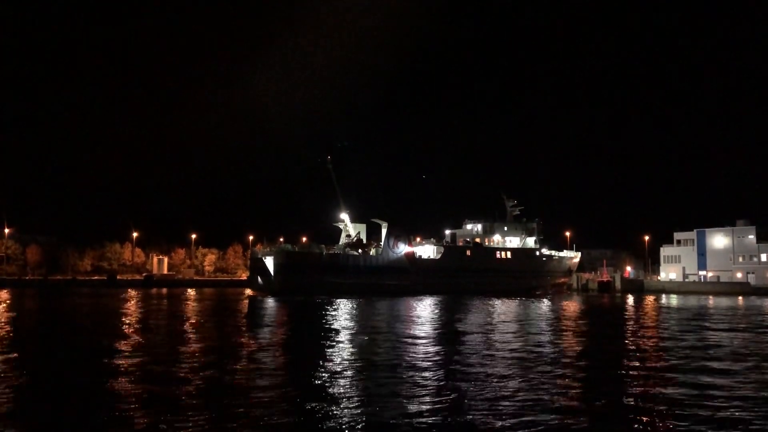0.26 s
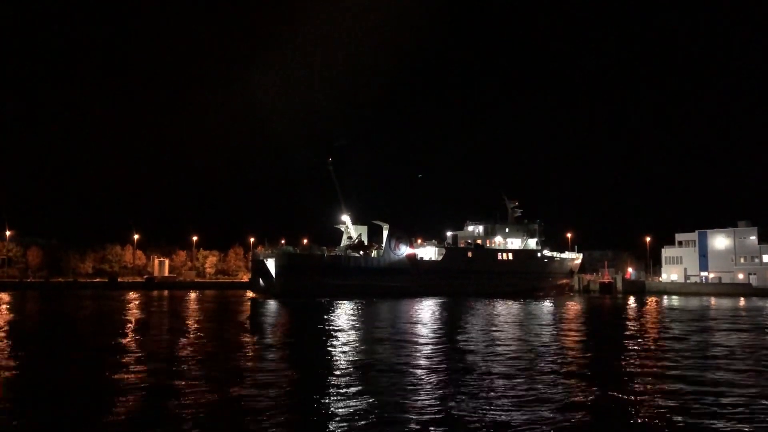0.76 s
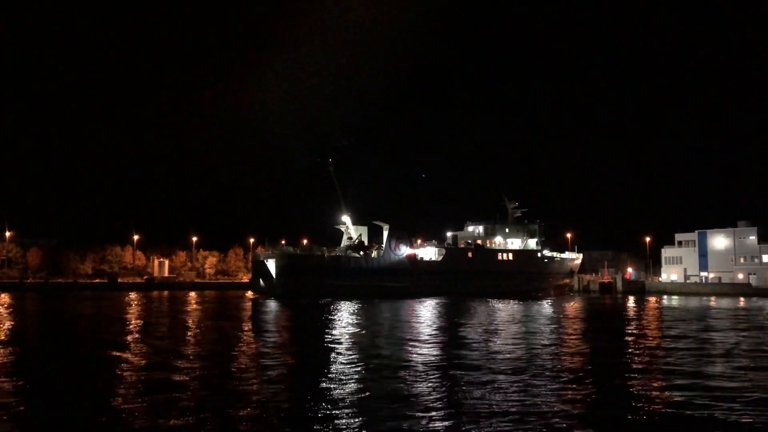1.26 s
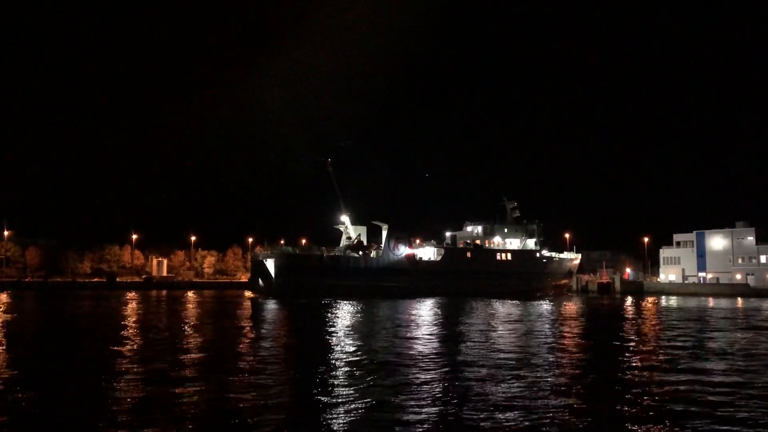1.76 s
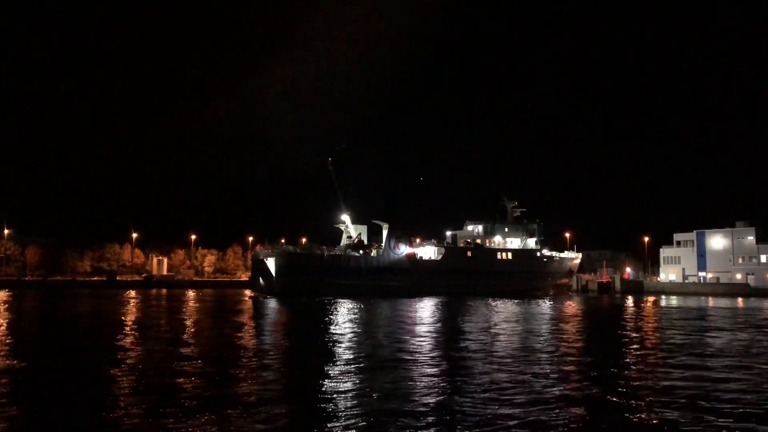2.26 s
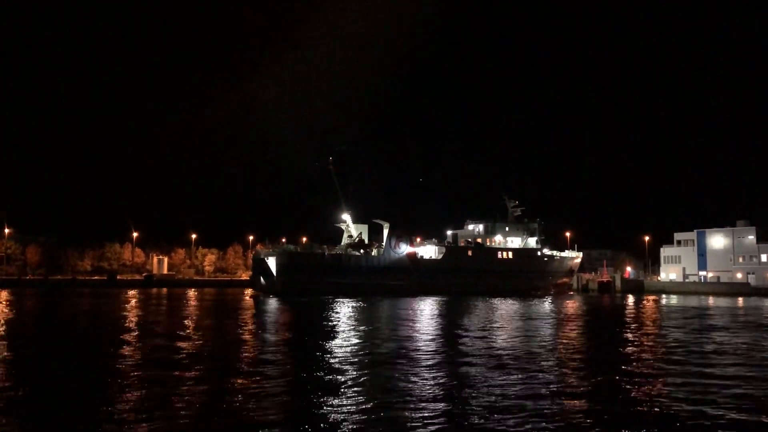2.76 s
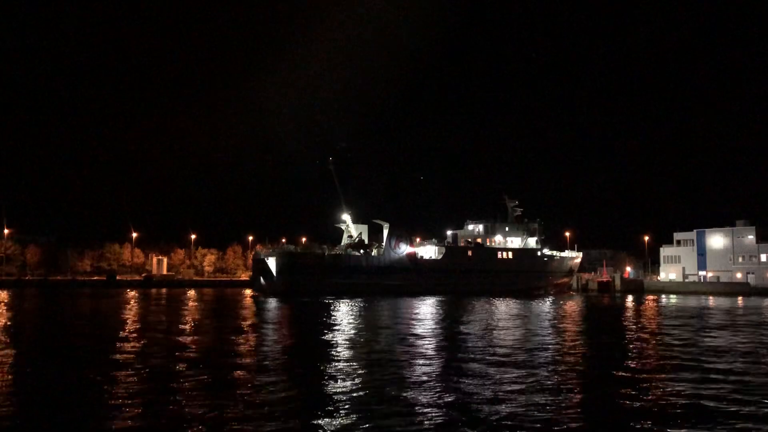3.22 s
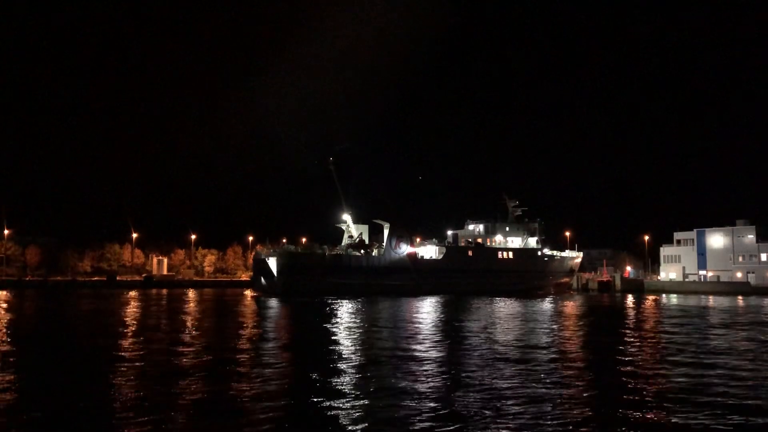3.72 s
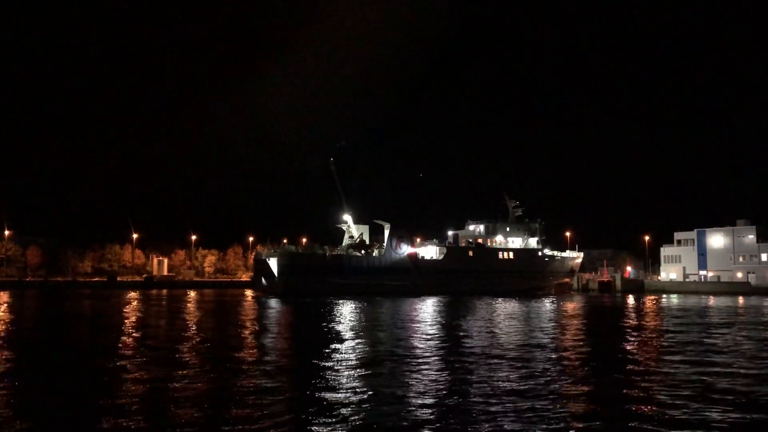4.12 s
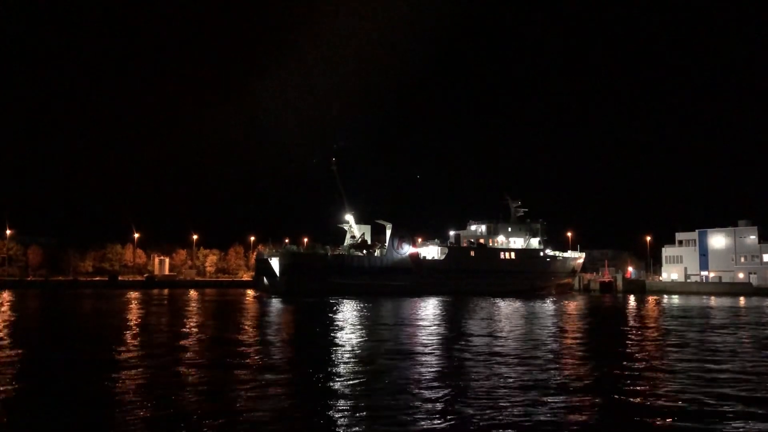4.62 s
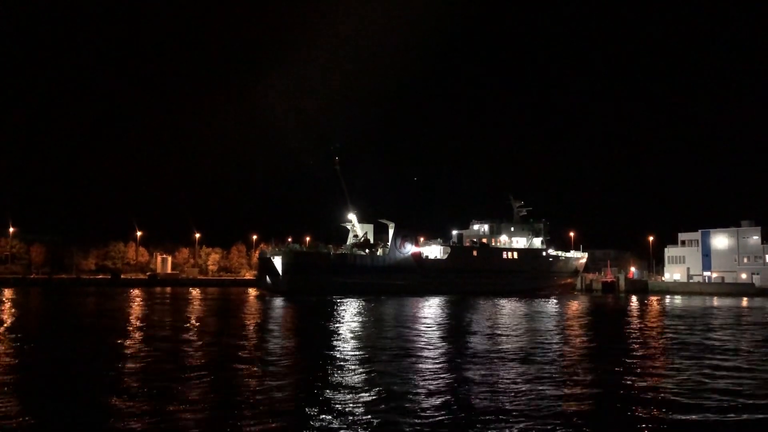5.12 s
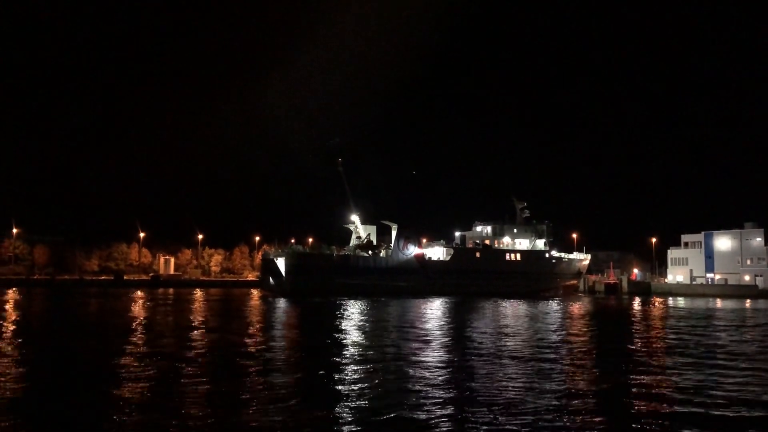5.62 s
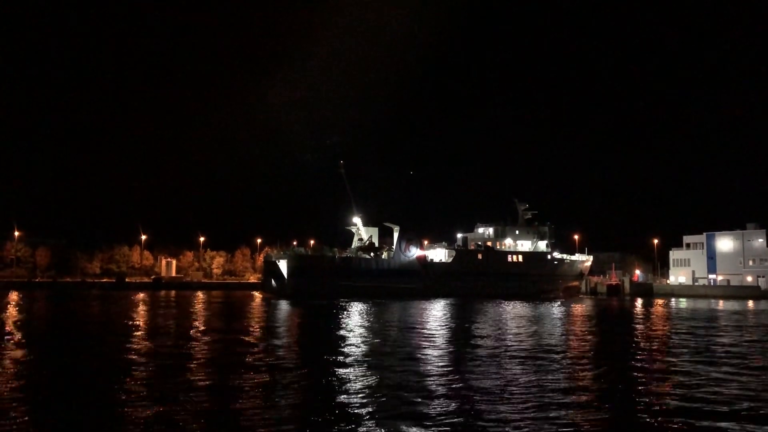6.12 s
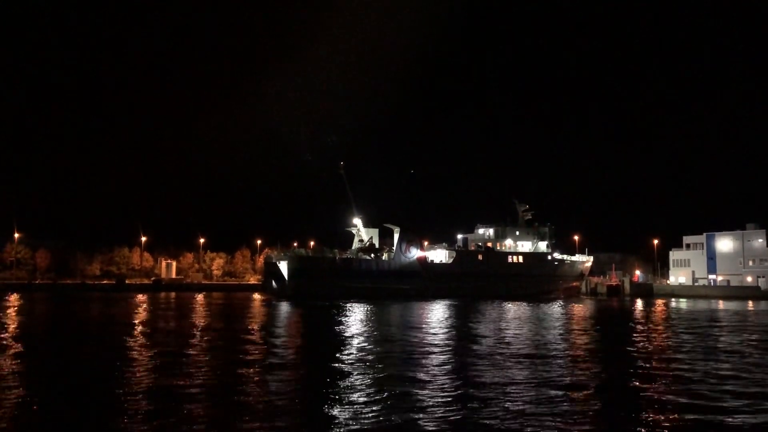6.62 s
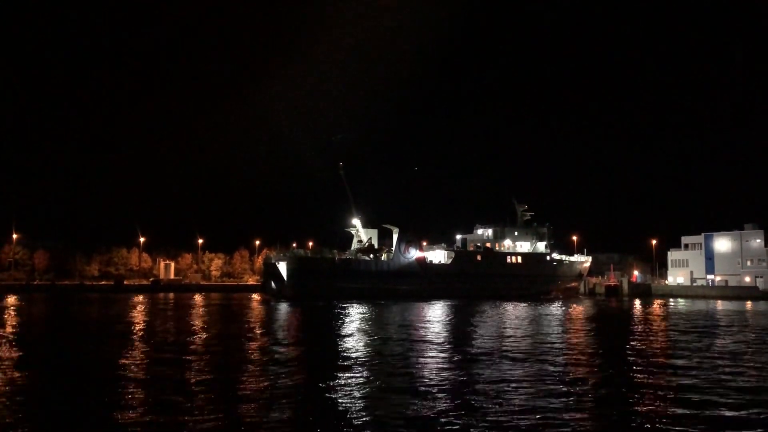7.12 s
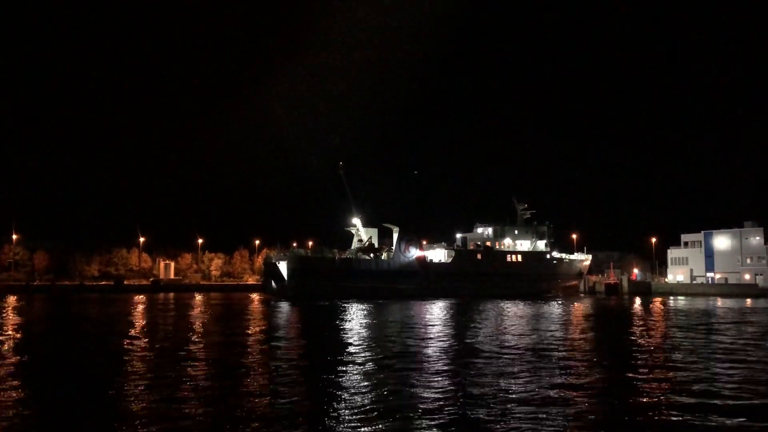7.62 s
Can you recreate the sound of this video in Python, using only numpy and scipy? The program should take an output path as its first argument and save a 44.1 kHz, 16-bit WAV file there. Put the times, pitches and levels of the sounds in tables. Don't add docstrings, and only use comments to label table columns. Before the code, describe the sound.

A steady low engine drone from a ferry far over the water continues throughout, with muffled funnel booms and a faint, wavering mid-pitched whine. In the foreground, near the microphone, water laps quietly on stone: gentle hissing, crisp popping bubbles and short rounded plops. The lapping is livelier at first, briefly slaps midway, then thins out. Outdoor, open, with light hiss.

```python
import sys
import numpy as np
from scipy import signal
from scipy.fft import rfft, irfft, next_fast_len
from scipy.io import wavfile

SR = 44100
rng = np.random.default_rng(int(sys.argv[2]) if len(sys.argv) > 2 else 0)


def rack_gain(trim_db):
    fader = np.asarray(trim_db, float)
    return 10 ** (fader / 20)


def transcribe(signal):
    frames = np.atleast_2d(signal).T
    limited = np.clip(frames, -1, 1)
    pcm = np.round(limited * 32767).astype(np.int16)
    wavfile.write(sys.argv[1], SR, pcm)


N = 347050
TIME = np.arange(N) / SR


def rms_one(x):
    return x / np.sqrt(np.mean(x ** 2) + 1e-20)


def in_time(rows):
    s, *columns = np.transpose(rows)
    return [np.interp(TIME, s, c) for c in columns]


def swells(rows, floor_db):
    power = rack_gain(floor_db) ** 2
    for s, db, length in rows:
        power = power + rack_gain(db) ** 2 * np.exp(-4 * ((TIME - s) / length) ** 2)
    return 10 * np.log10(power)


def drift(rate):
    r = np.exp(-80 * np.pi * rate / SR)
    slow = signal.lfilter([1], [1, -2 * r, r * r], rng.standard_normal(N // 40 + 2002))[2000:]
    return np.interp(np.arange(N) / 40, np.arange(len(slow)), rms_one(slow - slow.mean()))


def tone(cycles, db):
    return np.sqrt(2) * rack_gain(db) * np.sin(2 * np.pi * (cycles + rng.random()))


def noise_bands(spectrum, source, patchy_db, rate):
    size = next_fast_len(N)
    hz = np.maximum(np.fft.rfftfreq(size, 1 / SR), 1)
    at, db = np.transpose(spectrum)
    colour = rack_gain(np.interp(np.log(hz), np.log(at), db, left=-90, right=-90))
    shaped = rfft(source, size) * colour
    half_octave = 2 * np.log2(hz)
    steps = np.arange(np.floor(2 * np.log2(at[0])), np.ceil(2 * np.log2(at[-1])) + 1)
    together = drift(rate / 4)
    slices = []
    for k in steps:
        band = irfft(shaped * np.clip(1 - abs(half_octave - k), 0, 1), size)[:N]
        slices.append(band * rack_gain(patchy_db * (0.87 * together + drift(rate))))
    slices = np.array(slices)
    return 2 ** (steps / 2), slices / np.std(slices.sum(axis=0))


def ring(clicks, hz, turns):
    r, w = rack_gain(-60 * hz / (turns * SR)), 2 * np.pi * min(hz, SR / 2.5) / SR
    return signal.lfilter([0, np.sin(w)], [1, -2 * r * np.cos(w), r * r], clicks)


def grains(per_s, spread_db):
    chance = per_s * rack_gain(4.0 * drift(9)) / SR
    born = (rng.random(N) < chance) * rng.choice([-1, 1], N)
    return rms_one(born * rack_gain(spread_db * np.minimum(rng.exponential(1, N), 5)))


def microphone_hiss():
    # (frequency [Hz], density [dB per Hz])
    self_noise = [(5000, -6), (8000, -1.5), (10000, -5), (12500, -3), (14500, -1), (15500, 3), (17000, 1.5)]
    slices = noise_bands(self_noise, rng.standard_normal(N), patchy_db=1.0, rate=14.0)[1]
    return rack_gain(-80.5) * slices.sum(axis=0)


def wash():
    # (time [s], level [dB])
    waves = [(0.0, -69), (1.1, -67), (1.75, -69.5), (2.25, -70.5), (2.55, -70), (2.9, -70), (3.4, -70.5),
             (3.55, -72.5), (4.65, -74.5), (5.4, -71.5), (6.15, -73), (7.87, -75)]
    # (time [s], fizz peak [dB], length [s])
    slaps = [
        (2.97, -66.5, 0.065),
        (3.1, -67.5, 0.072),
        (3.18, -67, .07),
        (3.29, -66.5, 0.08),
        (3.44, -76, .06),
    ]
    # (time [s], peak [dB], length [s])
    breaks = [
        (0.27, -86, 0.33),
        (3.15, -86, .08),
        (3.79, -79, .08),
    ]
    # (frequency [Hz], density [dB per Hz])
    fizz = [(1700, -25), (2000, -2.5), (2400, -1.5), (3500, -2), (4300, -7), (5300, -10), (7500, -18.5),
            (9000, -24.5), (11000, -30), (14000, -44)]

    lively_db, = in_time(waves)
    fizz_db = swells(slaps, lively_db)
    slosh_db = -59.5 + 0.42 * (fizz_db - fizz_db.mean())
    foam_db = swells(breaks, -86.5 + 0.4 * (lively_db - lively_db.mean()))

    bursts = grains(per_s=700 * rack_gain(fizz_db + 70), spread_db=3.5)
    source = rng.standard_normal(N) + 0.5 * bursts
    centres, slices = noise_bands(fizz, source, patchy_db=0.67, rate=14.4)
    dull = centres < 5000
    hiss = rack_gain(slosh_db) * rms_one(slices[dull].sum(axis=0))
    hiss += rack_gain(fizz_db + 1.5) * rms_one(slices[~dull].sum(axis=0))

    foam = np.zeros(N)
    for hz in (11500, 12800, 14000, 15300):
        crackle = grains(per_s=150, spread_db=3.0) + 0.76 * rng.standard_normal(N)
        foam += ring(crackle, hz, 18.0)
    return hiss + rack_gain(foam_db) * rms_one(foam)


def chance_pops(count=80):
    when, size, luck = rng.random((count, 3)).T
    s = 0.011 + when ** 1.8 * (N / SR - 0.03)
    hz = 14800 * 0.4 ** (size ** 2.3)
    db = -67 + 8 * np.log2(14000 / hz) - 6.0 * (luck - 0.5)
    return list(zip(s, db, hz))


def foam_raft(count=14):
    return [(3.745 + 0.07 * a ** 0.7, -63 - 4.0 * (b - 0.5), 11500 + 3300 * c)
            for a, b, c in rng.random((count, 3))]


def pops():
    # (time [s], peak [dB], centre [Hz])
    clear_pops = [(0.0687, -52, 6500), (0.2973, -60, 11600), (0.4477, -58, 13000), (0.9185, -46, 5060),
                  (1.1807, -50, 7140), (1.5259, -49, 6800), (1.5804, -62, 11700), (1.751, -45, 4000),
                  (1.8355, -51, 8300), (2.0317, -61, 10700), (2.1697, -63, 12900), (2.4171, -51, 6500),
                  (2.6869, -47, 5000), (3.1875, -59, 10600), (3.6726, -52, 5800), (3.6839, -63, 12800),
                  (3.7783, -47, 5000), (3.962, -55, 7200), (3.9999, -53, 13400), (4.2668, -63, 13200),
                  (4.5807, -65, 13200), (4.9677, -44, 4400), (5.1206, -53, 7200), (5.2175, -53, 6500),
                  (5.76, -49, 5700), (5.8456, -50, 5100), (6.5886, -61, 12000), (6.631, -52, 6500),
                  (6.8894, -51, 5500), (7.4047, -65, 11900)]
    # (time [s], peak [dB])
    foam_ticks = [(0.0575, -67.5), (0.1615, -64), (0.3016, -66), (1.2154, -67), (1.4934, -65),
                  (2.0939, -65), (2.2665, -65), (2.2846, -65), (2.4755, -66), (2.5812, -65), (2.7506, -65),
                  (7.1527, -66), (7.5613, -64), (7.6636, -66)]
    rows = clear_pops + [(s, db, 13600) for s, db in foam_ticks] + chance_pops() + foam_raft()

    out, lag = np.zeros(N), np.arange(-150, 350) / SR
    for (s, db, hz), phase in zip(rows, rng.random((len(rows), 1))):
        band_hz = 1500 + 0.17 * hz
        span = 0.75 / band_hz * np.where(lag < 0, 0.6, 1.6)
        burst = np.exp(-(lag / span) ** 2 / 2) * np.cos(2 * np.pi * (hz * lag + phase))
        at = round(s * SR) - 150
        out[at:at + len(lag)] += rack_gain(db) * burst
    return out


def plops():
    # (time [s], peak [dB], frequency [Hz])
    large_bubbles = [(0.1027, -42, 3270), (0.4868, -46, 3590), (0.9118, -43, 3650), (2.461, -44, 3200),
                     (2.4907, -45, 3190), (2.9901, -46, 3110), (3.1862, -43, 3280), (3.2879, -46, 3110),
                     (3.4146, -49, 3090), (3.8062, -43, 3700), (3.8874, -53, 3200), (4.9666, -45, 3320),
                     (5.238, -43, 3200), (5.8691, -44, 3330), (6.344, -51, 3350)]
    out, click = np.zeros(N), np.eye(1, 700)[0]
    for s, db, hz in large_bubbles:
        at = round(s * SR)
        body = ring(ring(click, hz, 24.0), hz, 9.0)
        snap = 0.3 * ring(click, 2.3 * hz, 3.0)
        out[at:at + 700] += rack_gain(db - 3.5) * (body / abs(body).max() + snap)
    return out


def roar():
    # (frequency [Hz], density [dB per Hz])
    flow_noise = [(25, -34), (45, -15), (65, -3.5), (100, -5), (135, -1.5), (185, -2), (250, -5),
                  (320, -12.5), (420, -8.5), (500, -14.5), (1000, -15.5), (1500, -20), (1800, -26),
                  (2100, -37)]
    deep_db = -40 + 0.15 * drift(0.38)
    upper_db = -43.5 + 0.075 * drift(0.33)
    centres, slices = noise_bands(flow_noise, rng.standard_normal(N), patchy_db=0.58, rate=9.9)
    deep = centres < 380
    out = rack_gain(deep_db) * rms_one(slices[deep].sum(axis=0))
    return out + rack_gain(upper_db) * rms_one(slices[~deep].sum(axis=0))


def funnel():
    # (frequency [Hz], wander [Hz])
    funnel_modes = [
        (180.3, 3.55),
        (134.5, 6.51),
    ]
    # (time [s], peak [dB])
    upper_surges = [(0.22, -45), (0.5, -47), (0.85, -47.5), (1.5, -43), (2.8, -44.5), (3.38, -49),
                    (3.95, -52), (4.5, -50), (5.6, -45), (6.1, -48), (6.78, -41), (7.7, -50)]
    # (time [s], peak [dB])
    lower_surges = [(0.1, -49), (0.42, -47), (0.72, -45), (1.12, -49), (1.9, -46), (2.78, -46), (3.25, -50),
                    (3.95, -45), (4.42, -49), (4.9, -49), (5.27, -44.5), (5.75, -43.5), (6.3, -43.5),
                    (7.0, -40.5), (7.87, -50)]
    surge_s, idle_db = 0.31, -57.5
    out = np.zeros(N)
    for (hz, wander), surges in zip(funnel_modes, (upper_surges, lower_surges)):
        cycles = np.cumsum(hz + wander * drift(2.497)) / SR
        boom_db = swells([(s, db, surge_s) for s, db in surges], idle_db)
        out += tone(cycles, boom_db + 1.03 * drift(6.1))
    return out


def engines():
    # (time [s], level [dB])
    firing = [(0.0, -32.5), (0.15, -31), (0.42, -34.5), (0.9, -32.5), (1.12, -33.5), (2.26, -33.5),
              (2.45, -32.5), (5.06, -33), (5.24, -31.5), (5.46, -33.5), (6.4, -34), (7.19, -32.5),
              (7.87, -32.5)]
    # (multiple of the cycle [1], level [dB rms])
    engine_orders = [(6, -53), (7, -62), (12, -59), (14, -57), (16, -61), (18, -57), (40, -65)]
    # (frequency [Hz], level [dB rms])
    auxiliaries = [(35.5, -64), (38.5, -62), (139.0, -49), (1668.5, -74)]
    cycle_hz = 59.75 / 8
    cycle = cycle_hz * TIME + 0.0066 * drift(0.34)
    out = tone(8 * cycle, in_time(firing)[0])
    for order, db in engine_orders:
        out += tone(order * cycle, db + 2.0 * drift(0.87))
    for hz, db in auxiliaries:
        out += tone(hz * TIME, db + 0.67 * drift(0.88))
    return out


def gear():
    # (time [s], 4th mesh partial [Hz])
    mesh_speed = [(0.0, 1431.1), (0.68, 1430.0), (2.1, 1432.2), (3.5, 1432.6), (4.95, 1432.4),
                  (6.4, 1431.5), (7.87, 1432.1)]
    # (time [s], peak [dB
    # rms], length [s])
    first_clear = [(0.22, -44, 0.62), (1.65, -45.5, 0.73), (2.2, -50.5, 0.55), (3.0, -46, .35),
                   (3.62, -41, 0.74), (4.55, -43.5, 0.94), (5.1, -46, 0.71), (5.85, -51, .3),
                   (6.75, -45.5, .7), (7.8, -49.5, .4)]
    second_clear = [(0.22, -55, 0.46), (1.3, -56, 0.31), (1.8, -57, 0.38), (2.6, -55, .5),
                    (4.12, -48.5, 0.3), (4.45, -50, 0.39), (5.25, -52.5, .3), (5.6, -49, 0.38),
                    (6.35, -57, 0.47), (7.7, -57, .3)]
    fourth_clear = [(0.32, -55, 0.13), (0.9, -50.5, 0.61), (1.3, -48.5, 0.35), (1.63, -49, 0.13),
                    (2.6, -47, .6), (3.15, -48.5, .3), (3.7, -50, 0.13), (4.28, -43.5, 0.42),
                    (4.72, -48, 0.39), (5.5, -49.5, 0.65), (6.0, -51, 0.36), (6.62, -49.5, 0.28),
                    (7.4, -48, 0.83)]
    fifth_clear = [(1.1, -67, .4), (1.8, -64, .3), (2.9, -61.5, .4), (3.65, -63, .3), (4.25, -60, .4),
                   (4.85, -62, 0.35), (5.4, -64, .3), (6.2, -64, .3), (6.7, -62, .5), (7.3, -62.5, 0.35)]
    # (multiple of the mesh [1], level [dB rms])
    mesh_weak = [(3, -63), (7, -81), (8, -83)]
    # (mesh partial [1], shaft turns away [1], level [dB rms])
    side_lines = [(1, -4, -68), (1, -3, -67), (1, -2, -66), (1, 1, -56), (1, 3, -62), (1, 4, -60),
                  (1, 5, -61), (1, 6, -65), (1, 8, -62), (1, 9, -62), (2, -4, -67), (2, 4, -66),
                  (2, 8, -69), (3, -4, -68), (4, -8, -67), (4, -4, -63), (4, -3, -67), (4, -1, -67),
                  (4, 1, -65), (4, 4, -66), (4, 8, -70), (5, 1, -76), (5, -4, -78), (5, -10, -78)]
    shaft_hz = 7.56

    mesh = np.cumsum(in_time(mesh_speed)[0]) / 4 / SR
    shakes = [drift(2.06) for _ in range(6)]
    partials = [(1, swells(first_clear, -56)), (2, swells(second_clear, -73.5)),
                (4, swells(fourth_clear, -56)), (5, swells(fifth_clear, -76))] + mesh_weak
    out = np.zeros(N)
    for k, db in partials:
        twinkle_db = 1.2 * drift(9.0)
        cycles = k * (mesh + 0.012 * shakes[k % 6])
        out += tone(cycles, db + 0.8 * shakes[(k + 3) % 6] + twinkle_db)
    for n, (k, away, db) in enumerate(side_lines):
        cycles = k * (mesh + 0.02 * shakes[n % 6]) + away * shaft_hz * TIME
        out += tone(cycles, db + 2.5 * shakes[(n + 2) % 6])
    return out


def scene():
    water = wash() + pops() + plops()
    ship = roar() + funnel() + engines() + gear()
    return (water + ship)[None]


def roll_off(x):
    return signal.sosfilt(signal.butter(12, 16720, fs=SR, output="sos"), x)


def record(dry):
    top_cut = signal.ellip(8, 0.2, 40, 15690, fs=SR, output="sos")
    mix = signal.sosfiltfilt(top_cut, dry + microphone_hiss())
    return roll_off(mix)


dry = scene()
out = record(dry)
transcribe(out)
```